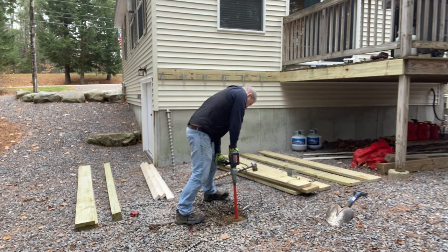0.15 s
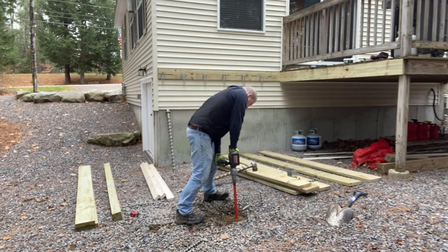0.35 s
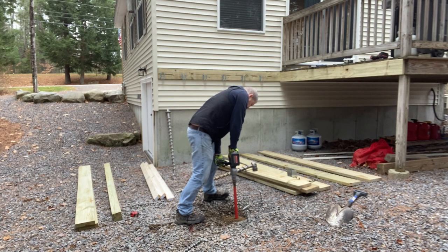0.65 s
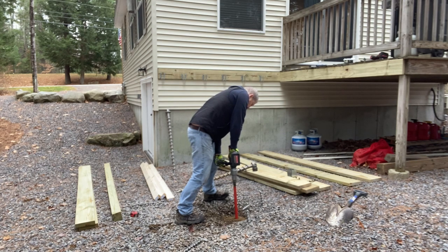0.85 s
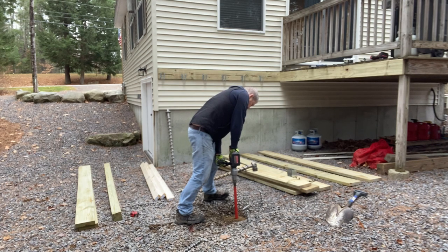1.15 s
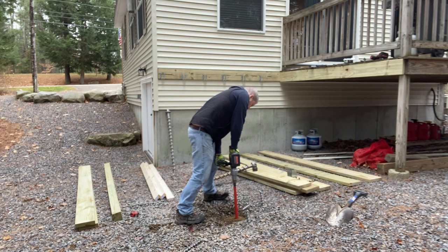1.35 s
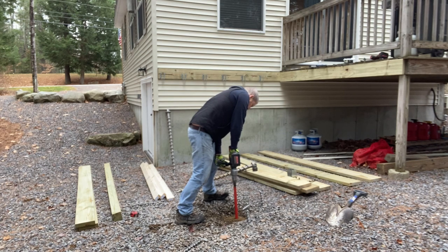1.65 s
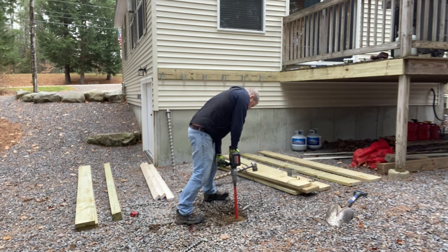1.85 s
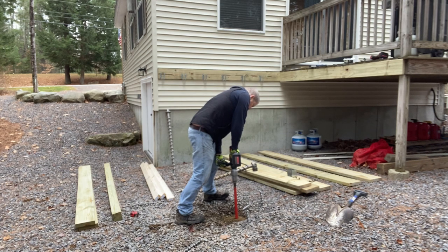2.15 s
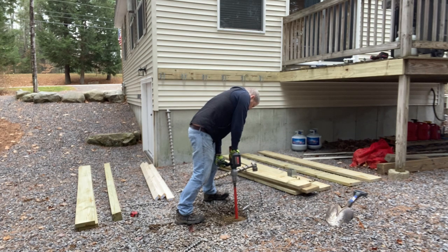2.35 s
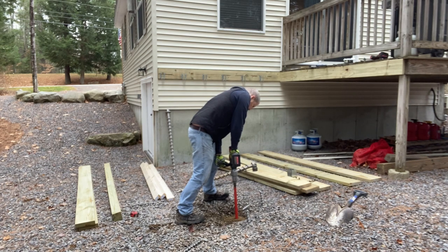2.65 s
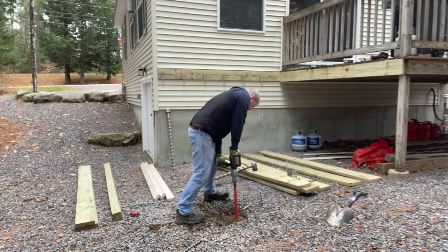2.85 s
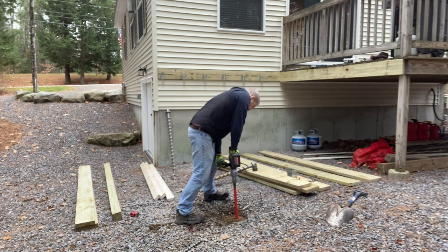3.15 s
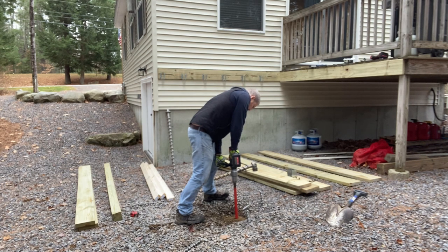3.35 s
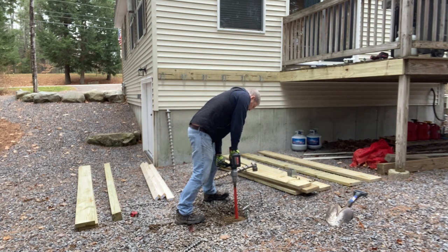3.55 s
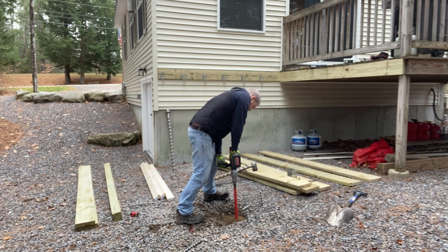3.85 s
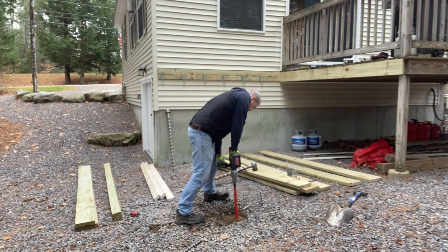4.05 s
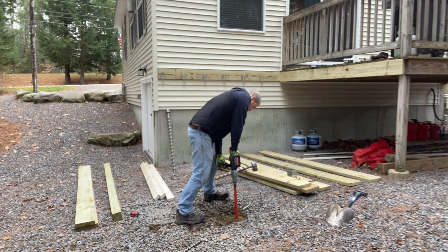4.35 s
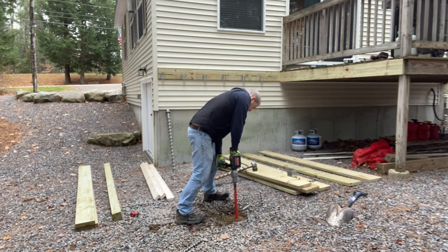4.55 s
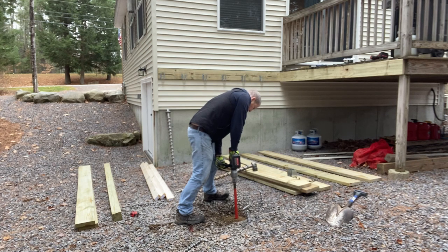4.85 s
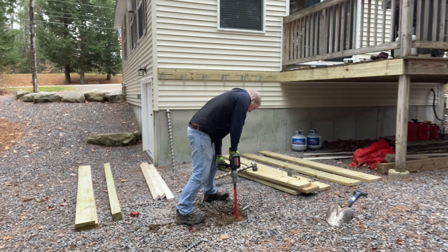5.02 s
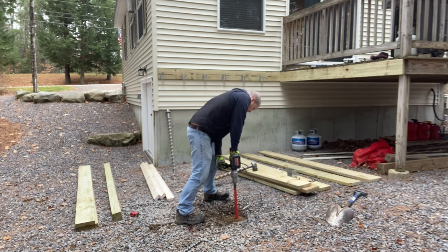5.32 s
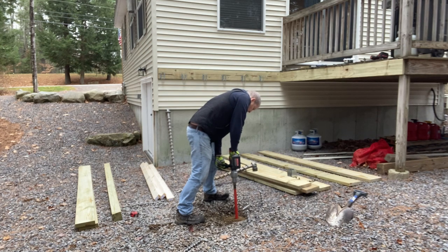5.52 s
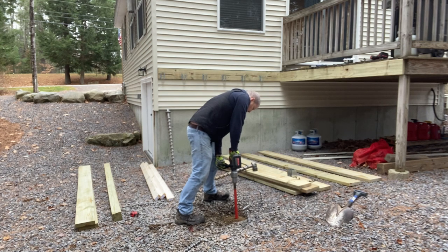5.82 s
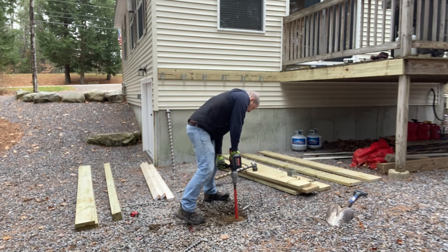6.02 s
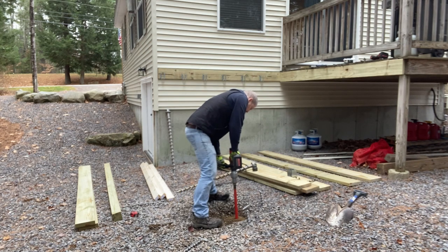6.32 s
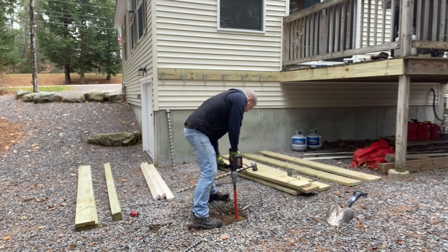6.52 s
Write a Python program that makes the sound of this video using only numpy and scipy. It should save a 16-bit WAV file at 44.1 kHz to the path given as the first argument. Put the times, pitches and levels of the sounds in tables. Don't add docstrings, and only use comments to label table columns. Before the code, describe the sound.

A cordless hammer drill hammers a steel rod into gravel outdoors, rapid metallic rattle for six seconds, then bounces, faint ring and quiet.

```python
import sys
import numpy as np
from scipy import signal
from scipy.fft import rfft, irfft, next_fast_len
from scipy.io import wavfile
from scipy.ndimage import uniform_filter1d

SR = 44100
rng = np.random.default_rng(int(sys.argv[2]) if len(sys.argv) > 2 else 0)


def undo_db(level):
    steps = np.asarray(level, float) / 20
    return 10 ** steps


def to_wav(sig):
    pcm = np.clip(np.atleast_2d(sig), -1, 1) * 32767
    pcm = np.round(pcm).astype(np.int16)
    wavfile.write(sys.argv[1], SR, pcm.T)


N = 294571

# (time [s], peak [dB], rod re peak [dB], shank [dB], housing [dB])
BOUNCES = [
    (6.22, -20, -6.5, -15, -25.5),
    (6.2388, -25.5, -5, -15, -38),
    (6.2572, -27, -16, -25, -23.5),
    (6.2684, -31, -8, -29, -28.5),
    (6.2866, -33, -0.5, -26, -33),
    (6.2915, -44, -10, -24.5, -33),
    (6.346, -24, -10.5, -19.5, -34.5),
    (6.3662, -36.5, 11, -25, -29),
    (6.3733, -27.5, -18, -38, -34),
]
# (time [s], level [dB])
MOTOR_LEVEL = [
    (0, -54.5),
    (6.2, -53.5),
    (6.3, -47),
    (6.39, -55.5),
    (6.43, -88),
    (6.68, -84),
]
# (time [s], slack [dB])
GRIP_SLACK = [(0, -2.5), (.45, -1), (1.3, -1.5), (2.4, 4.5), (3.1, -1.5), (3.85, -2.5), (4.85, 3.),
              (5.45, -2), (6.1, 3)]


def unit(x):
    return x / np.sqrt(np.mean(x ** 2))


def curve(table):
    time_s, level_db = np.transpose(table)
    return np.interp(np.arange(N) / SR, time_s, level_db)


def colour(x, points):
    hz, db = np.transpose(points)
    bins_hz = np.fft.rfftfreq(1024, 1 / SR)
    log_gain = np.log(undo_db(np.interp(np.log(bins_hz + 1), np.log(hz), db)))
    cepstrum = irfft(log_gain)
    cepstrum[1:512] *= 2
    cepstrum[513:] = 0
    return signal.oaconvolve(x, irfft(np.exp(rfft(cepstrum))))[:N]


def chatter(s, db, rise_s, fall_s, alike, grit_db, hz=None, size=400):
    t = np.arange(size) / SR
    shape = (1 - np.exp(-(t / rise_s) ** 2)) * np.exp(-t / fall_s)
    habit = rng.standard_normal(size)
    chance = rng.standard_normal((len(s), 2, size))
    grains = alike * habit + np.sqrt(1 - alike ** 2) * chance[:, 0]
    grains = grains * undo_db(grit_db * chance[:, 1]) * shape
    strength = np.linalg.norm(grains, axis=1)
    if hz:
        at_pitch = np.abs(grains @ np.exp(2j * np.pi * hz * t))
        strength = np.maximum(at_pitch, strength / 2)
    out = np.zeros(N + size)
    index = np.round(s * SR).astype(int)[:, None] + np.arange(size)
    np.add.at(out, index, grains * (undo_db(db) / strength)[:, None])
    return out[:N]


def ring(x, hz, db, t60):
    pole = np.exp(2j * np.pi * hz / SR - np.log(1000) / (t60 * SR))
    y = signal.lfilter([pole.imag], [1, -2 * pole.real, abs(pole) ** 2], x)
    return undo_db(db) * y / abs(pole.imag) * np.sin(np.angle(pole))


def steel(s, db, modes, alike):
    total = 0
    for mode in modes:
        push = chatter(s, db, rise_s=0.00055, fall_s=0.0012, alike=alike, grit_db=3, hz=mode[0], size=200)
        total = total + ring(push, *mode)
    return total


def blows():
    # (blow number, time [s])
    pace = [(0, -.0022), (18, .5184), (36, 1.0322), (54, 1.5483), (72, 2.0669), (90, 2.5835), (108, 3.0987),
            (125, 3.5918), (143, 4.11), (161, 4.6321), (179, 5.1504), (197, 5.6721), (215, 6.1894)]
    blows_per_turn, drag_s, jitter_s = 29.2, 0.0022, 0.0003
    number, time_s = np.transpose(pace)
    n = np.arange(number[-1] + 1)
    turn = n / blows_per_turn
    late = drag_s * np.cos(2 * np.pi * turn) + jitter_s * rng.standard_normal(len(n))
    return np.maximum(np.interp(n, number, time_s) + late, 0), turn


def housing_db(s):
    return -45.5 + 0.24 * np.interp(s, *np.transpose(GRIP_SLACK))


def still_air():
    # (frequency [Hz], density [dB per Hz])
    air_spectrum = [(30, 17.5), (100, 12.5), (300, 13), (1000, -38), (3000, -29.5), (8000, -38),
                    (13000, -55.5)]
    fade_db = np.interp(np.arange(N) / SR, [6.2, 6.35, 6.68], [-76, -68, -88])
    noise = rng.standard_normal((2, N))
    return np.array([unit(colour(side, air_spectrum)) for side in noise]) * undo_db(fade_db)


def yard(x):
    # (frequency [Hz], level [dB], t60 [s])
    tails = [(272, -18.5, 0.77), (692, -22.5, 0.41), (2250, -28, 0.6), (4700, -46, 0.93),
             (10600, -29, 0.33)]
    t = np.arange(SR // 2) / SR
    near = undo_db(18 - 60 * t / 0.049)
    response = 0
    for hz, db, t60 in tails:
        band = signal.butter(2, [hz / 1.6, min(hz * 1.6, 13500)], "bandpass", fs=SR, output="sos")
        noise = signal.sosfilt(band, rng.standard_normal((2, len(t))))
        response = response + noise * undo_db(db) * (near + undo_db(-60 * t / t60))
    response = response * undo_db(-9) * (t > 0.002)
    return signal.fftconvolve(x[None], response, axes=1)[:, :N]


def house_wall(x):
    lag = int(0.0172 * SR)
    echo = colour(x, [(1500, -17), (5000, -17.5), (12000, -18)])
    return np.concatenate([np.zeros(lag), echo[:-lag]])


def ground_dip(x):
    depth = np.clip(0.2 - 0.17 * curve(GRIP_SLACK), -1, 0.95)
    return x - depth * signal.lfilter(*signal.iirpeak(3030, 2.75, fs=SR), x)


def motor():
    # (frequency [Hz], density [dB per Hz])
    whir_spectrum = [(59, -65.5), (100, -25), (600, -18.5), (1610, -3), (3050, -8), (5420, -13), (6150, -3),
                     (8110, -23.5), (12700, -5.5), (14200, -30), (16000, -56.5)]
    hold = SR // 60
    flutter = np.repeat(rng.standard_normal(N // hold + 1), hold)
    flutter = uniform_filter1d(flutter, hold)[:N]
    whir = unit(colour(rng.standard_normal(N), whir_spectrum))
    return whir * undo_db(curve(MOTOR_LEVEL) + 3.3 * flutter)


def soil(s):
    # (frequency [Hz], level [dB], t60 [s])
    soil_modes = [(103, -7, 0.043), (162, -4, 0.034), (287.4, -7.5, 0.032), (389, -5.5, 0.027),
                  (443, -9, 0.027)]
    # (time [s], level [dB])
    thud_level = [(0.0, -58), (0.12, -54), (0.72, -69.5), (0.92, -62.5), (1.54, -70), (1.9, -65),
                  (2.43, -82), (2.8, -63.5), (3.3, -73), (3.56, -62.5), (4.02, -69.5), (4.35, -66.5),
                  (4.77, -77.5), (5.18, -63.5), (5.72, -73), (5.82, -56.5), (5.89, -68.5), (6.2, -76.5)]
    thud_db = curve(thud_level)
    bounce_s, bounce_db = np.array(BOUNCES).T[:2]
    push, bounce = np.zeros((2, N))
    push[(s * SR).astype(int)] = undo_db(2.7 * rng.standard_normal(len(s)))
    bounce[(bounce_s * SR).astype(int)] = undo_db(bounce_db + 31.5)

    late = np.roll(push, int(0.0075 * SR))
    thud = unit(ring(ring(late, hz=72, db=0, t60=0.06), hz=72, db=0, t60=0.025))

    knock = 0
    for hz, db, t60 in soil_modes:
        swell = ring(ring(push + bounce, hz, db, t60), hz, 0, t60)
        knock = knock + swell * hz ** 0.5 / t60

    rumble = ring(rng.standard_normal(N), hz=60, db=0, t60=0.027)
    rumble = unit(ring(rumble, hz=130, db=0, t60=0.013))
    running = undo_db(curve(MOTOR_LEVEL) - MOTOR_LEVEL[0][1])
    low = (thud + undo_db(-8.5) * rumble * running) * undo_db(thud_db)
    return low + unit(knock) * undo_db(0.36 * thud_db - 42)


def ram(s):
    # (frequency [Hz], level [dB])
    knock_spectrum = [(300, -29.5), (800, -3), (1600, -0.5), (2800, -1.5), (4200, 2), (6000, -3.5),
                      (9000, -8), (14000, -26)]
    chance = rng.standard_normal((len(s), 4)).T
    lean_db = housing_db(s)
    knock_s = np.maximum(s - 0.0078 + 0.0006 * chance[0], 0)
    knock = chatter(knock_s, lean_db + 30 + 2.5 * chance[1],
                    rise_s=0.00086, fall_s=0.0042, alike=0.18, grit_db=2.5)
    stones_s = s + 0.0037 + 0.0065 * np.abs(chance[2])
    stones = chatter(stones_s, lean_db + 18.5 + 1.9 * chance[3],
                     rise_s=0.00047, fall_s=0.00062, alike=0, grit_db=2.5)
    return colour(knock + stones, knock_spectrum)


def hammer(s, turn):
    # (frequency [Hz], level [dB], t60 [s])
    bit_modes = [(5474, 4.5, 0.015), (5510, 0.5, 0.0099), (5717, 0.5, 0.021), (5150, -7.5, 0.03),
                 (5910, -3.5, 0.003)]
    shank_modes = [(3825, 0.9, 0.017), (4114, 0.071, 0.012), (4510, 0, 0.0069)]
    rod_modes = [(8178, 8.5, 0.014), (8200, 4, 0.0097), (8140, -4.5, 0.016), (6570, -5, 0.049)]
    upper_modes = [(10323, 1.5, 0.011), (10480, -1, 0.03), (9870, -5, 0.053), (12500, -25, 0.037),
                   (12400, -9.5, 0.014), (12420, -7, 0.025), (13400, -1.5, .025), (14140, -8, 0.032)]
    housing_modes = [(1655, -3, 0.013), (1650, -11.5, 0.0065), (2370, -14.5, 0.023), (1100, -13.5, 0.017),
                     (812, -3, 0.003)]
    cup_modes = [(7381, 0, .7), (7413, 0, .7)]
    # (frequency [Hz], level [dB])
    crack_spectrum = [(500, -28.5), (1200, -20), (2800, -15.5), (4700, 4), (6400, 1), (7200, -8.5),
                      (11000, -12.5), (13000, 1.5), (15000, -1), (17000, -19.5)]
    # (eighth of a turn, bit [dB], rod [dB], shank [dB])
    facing = [(0, -17, -27.5, -21.5), (1, -16, -25, -20), (2, -18.5, -26.5, -31.5), (3, -16.5, -24.5, -32),
              (4, -20.5, -32.5, -24), (5, -19, -29, -21), (6, -18, -29, -26.5), (7, -20, -28, -25)]
    hard_blows = [2, 7, 28, 30, 32, 34, 35, 60, 62, 63, 67, 88, 90, 118, 120, 147, 174, 200, 201, 203]

    luck = rng.standard_normal((len(s), 4)).T
    bit, rod, shank = (np.interp(8 * turn, np.arange(8), db, period=8) for db in np.transpose(facing)[1:])
    bit = bit + 1.6 * luck[0]
    rod = rod + 0.8 * (0.17 * luck[0] + luck[1]) - bit
    bit[hard_blows] += 2.5
    easing_s = np.maximum(s - 6.09, 0)
    bit = bit - 44 * easing_s
    shank = shank + 41.5 * easing_s
    shank = shank + 2.5 * signal.lfilter([1], [1, 0, -0.21], luck[2])
    shell = housing_db(s) + 17.5 + 2.17 * luck[3]

    driven = np.column_stack([s, bit, rod, shank, shell])
    s, db, rod_db, shank_db, shell_db = np.vstack([driven, BOUNCES]).T
    s = np.maximum(s - 0.0004, 0)
    parts = steel(s, db - 8.5, bit_modes, alike=1.0)
    parts += steel(s, shank_db - 7.5, shank_modes, alike=0.36)
    parts += steel(s, db + rod_db - 5, rod_modes, alike=0.8)
    parts += steel(s, 0.51 * db - 22.5, upper_modes, alike=0.16)
    parts += steel(s, shell_db - 3, housing_modes, alike=0.22)
    last = chatter(s[-3:-2], np.array([-64]), rise_s=0.0003, fall_s=0.0005,
                   alike=0, grit_db=-1, hz=cup_modes[0][0])
    parts += sum(ring(last, *mode) for mode in cup_modes)

    crack = chatter(s, 0.72 * db + 10.5, rise_s=0.00047, fall_s=0.0016, alike=0.48, grit_db=1)
    parts_low_cut = signal.butter(3, 750, "highpass", fs=SR, output="sos")
    return signal.sosfilt(parts_low_cut, parts), colour(crack, crack_spectrum)


def ports(x):
    # (frequency [Hz], lead of the left port [rad])
    port_lead = [(0, 0), (260, -2.0), (780, -0.4), (1550, -0.2), (2840, -1.1), (4570, -1.2), (6030, -2.3),
                 (6550, -2.6), (6800, -0.6), (7240, 0.1), (9470, 0.2), (10900, 0.8), (14000, 2.7),
                 (16000, 3.3)]
    hz, lead = np.transpose(port_lead)
    size = next_fast_len(N)
    half_lead = np.exp(0.5j * np.interp(np.fft.rfftfreq(size, 1 / SR), hz[1:], lead[1:]))
    spectrum = rfft(x, size)
    left = spectrum * half_lead * undo_db(5)
    right = spectrum / half_lead * undo_db(5.5)
    return irfft(np.array([left, right]), size)[:, :N]


def scene():
    s, turn = blows()
    ringing, crack = hammer(s, turn)
    wall = house_wall(ringing + crack)
    clatter = crack + ram(s) + motor()
    ringing, clatter = ground_dip(np.array([ringing, clatter]))
    direct = ports(ringing + clatter + wall + soil(s))
    return direct + yard(clatter + 0.36 * ringing) + still_air()


def roll_off(x):
    return signal.sosfilt(signal.butter(12, 16470, fs=SR, output="sos"), x)


def record(dry):
    top = signal.ellip(8, 0.2, 60, 16000, fs=SR, output="sos")
    bass = signal.butter(2, 45, "highpass", fs=SR, output="sos")
    mix = signal.sosfilt(np.vstack([top, bass]), dry)
    return roll_off(mix)


dry = scene()
out = record(dry)
to_wav(out)
```